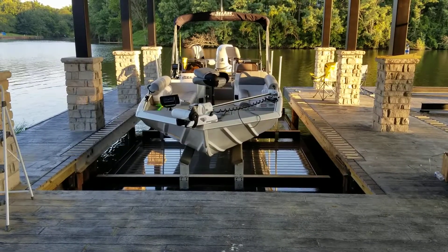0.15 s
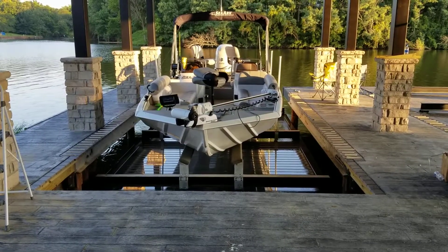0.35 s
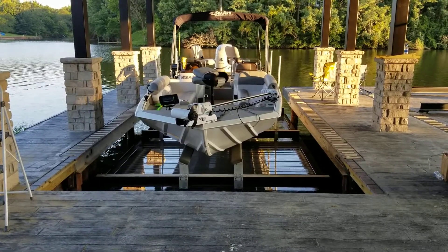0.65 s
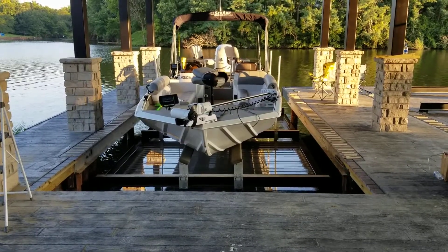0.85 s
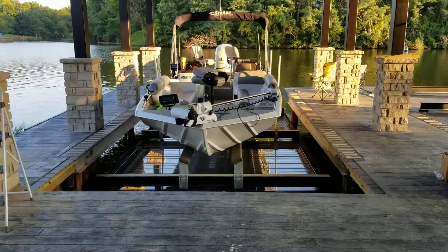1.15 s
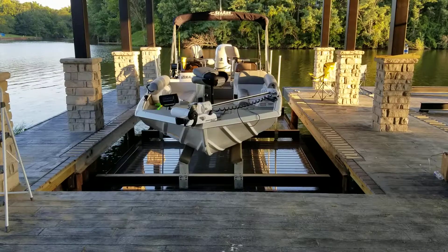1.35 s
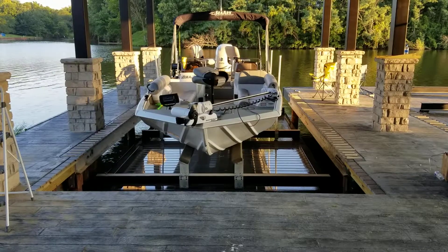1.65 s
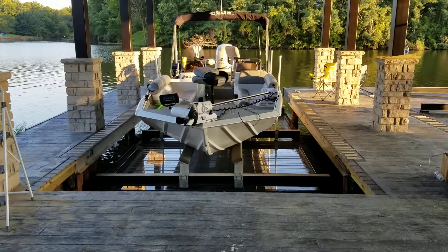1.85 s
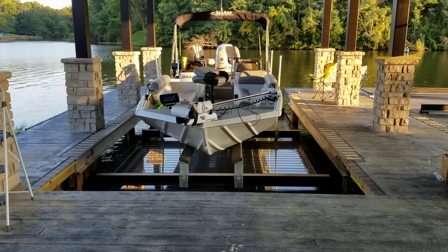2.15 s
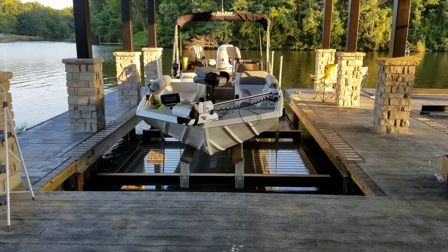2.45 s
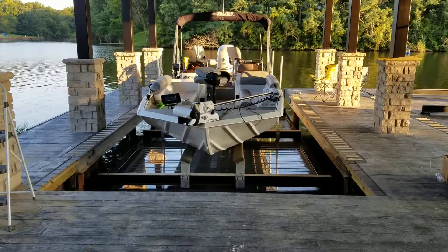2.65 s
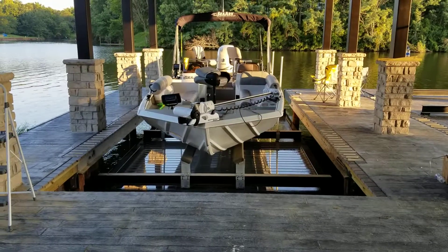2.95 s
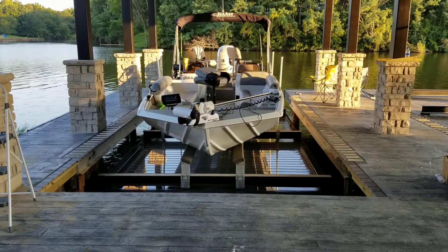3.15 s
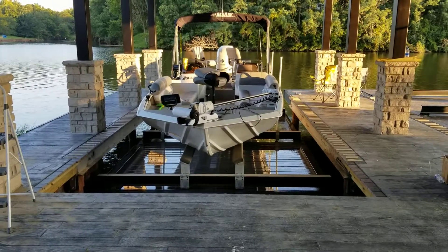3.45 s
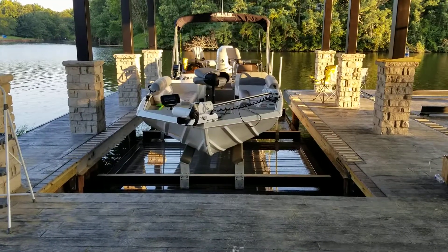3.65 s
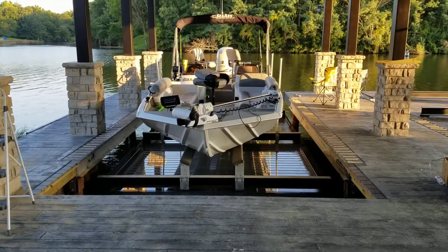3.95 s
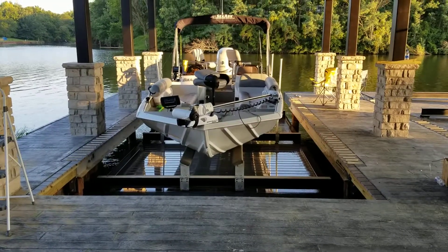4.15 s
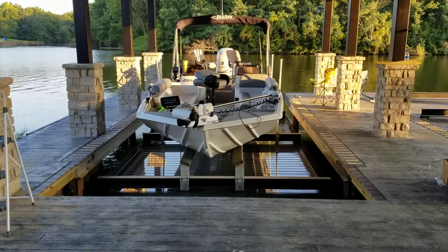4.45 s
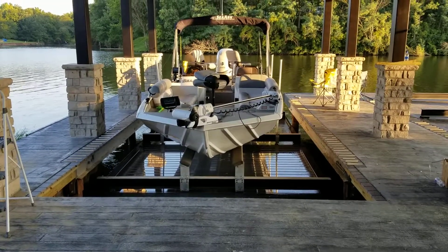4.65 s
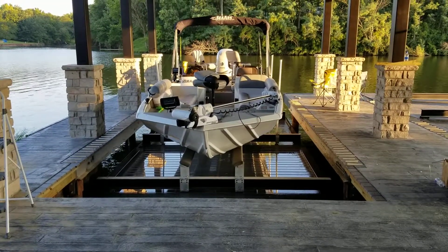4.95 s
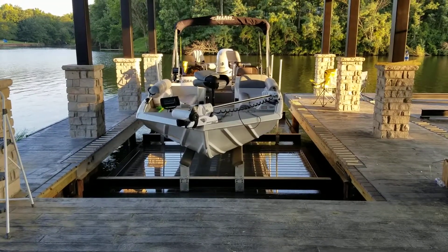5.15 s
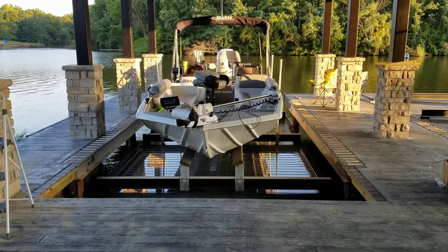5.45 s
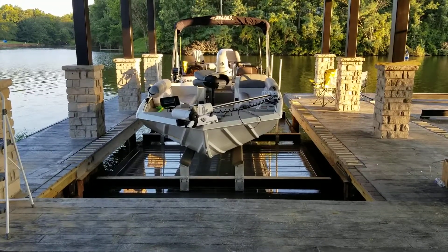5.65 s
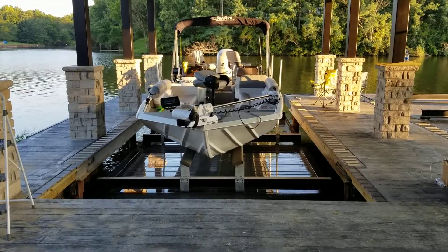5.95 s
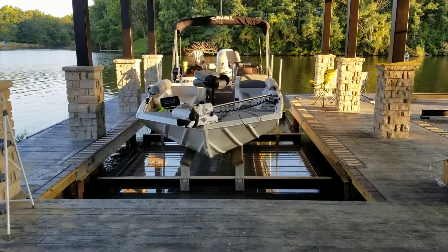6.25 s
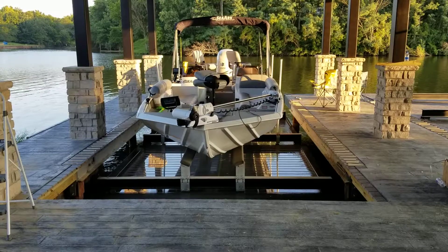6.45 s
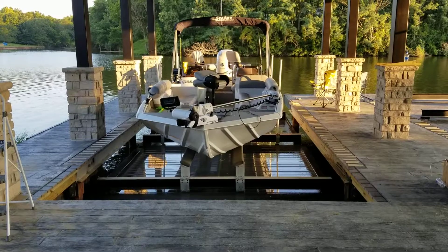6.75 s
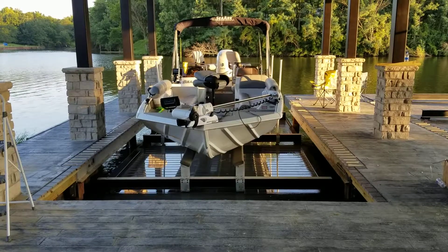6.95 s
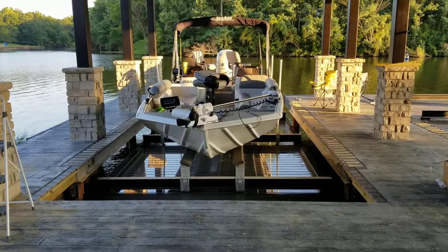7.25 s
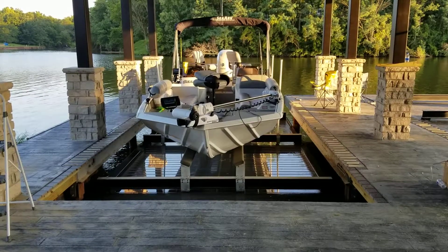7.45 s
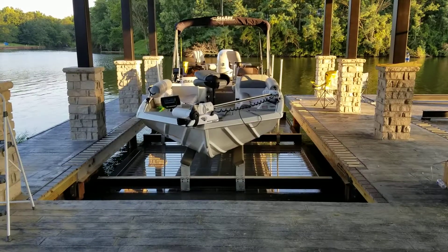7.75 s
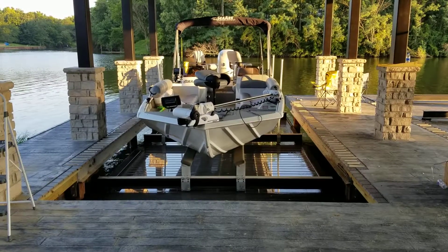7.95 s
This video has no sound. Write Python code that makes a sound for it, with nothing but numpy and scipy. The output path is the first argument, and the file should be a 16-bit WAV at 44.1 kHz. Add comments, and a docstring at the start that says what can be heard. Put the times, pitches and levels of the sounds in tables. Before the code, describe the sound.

A loaded hydraulic pump raising a boat runs without pause in an open boathouse. Its firm, steady gear whine carries a rough electric-motor buzz and rushing oil hiss, brighter toward the left. Far away, two low engines drone and beat together in a quick, even throb. After about four seconds the whine grows duller as the motor labours slightly. Stereo microphones stand close enough for the pump to dominate.

```python
"""Open boathouse, stereo microphones, pump on the left: a loaded hydraulic gear pump raises a boat.
From the start its eleven teeth whine, the uneven shaft buzzes, oil hisses through the valve.
Far off one engine drones; in the first seconds a second boom emerges and beats against it.
After about 4 s the whine dulls as the motor sags, most at 5.9 s; the commutator tone dips, then swells.
Near the end the second engine's overtones weaken, while booms and far rumble have slowly grown."""
import sys
import numpy as np
from scipy import signal
from scipy.fft import rfft, irfft
from scipy.io import wavfile

SR = 44100
rng = np.random.default_rng(int(sys.argv[2]) if len(sys.argv) > 2 else 0)


def store_wav(level_fs):
    """Save 16-bit WAV to argv[1]."""
    pcm = np.round(np.clip(np.atleast_2d(level_fs), -1, 1) * 32767)
    wavfile.write(sys.argv[1], SR, pcm.T.astype(np.int16))


N = 357113
TIME = np.arange(N) / SR  # s
RIGHT_LAG_S = .000285  # extra travel time to the right microphone

# speed of the motor shaft: (t/s, turns per s)
SHAFT_SPEED = [(0, 49.238), (2.9, 49.272), (3.9, 49.246), (4.2, 49.223), (5.9, 49.123), (6.9, 49.221),
               (7.1, 49.21), (8.1, 49.223)]
START_TURNS_PER_S = SHAFT_SPEED[0][1]
SAG_TURNS_PER_S = 0.18  # loss of speed that counts as full load


def shaft_speed():
    """Turns per second of the motor, which slows as it labours."""
    return in_time(SHAFT_SPEED)[0]


def sag():
    """Turns per second that the motor has lost to its load."""
    speed = shaft_speed()
    return speed.max() - speed


def load():
    """Sag as a share of full load."""
    return sag() / SAG_TURNS_PER_S


def pump_line(turns, order, level_db, fade_db):
    """One line of the pump; echoes off deck and roof make the short waves fade and scatter more."""
    echoed = np.sqrt(order * START_TURNS_PER_S / 6000)
    each_side = np.array([drift(2.0), drift(0.89)])
    fading_db = fade_db * echoed * (drift(0.88) + 0.69 * each_side)
    scatter = .22 * min(echoed, 1) ** 6 * rng.standard_normal((2, 1))  # cycles
    cycles = order * turns + rng.random() + scatter
    return tone(cycles, np.reshape(level_db, (2, -1)) + fading_db)


TEETH = 11
# pressure ripple before edge and strain: (multiple of the tooth rate, left level/dB, right level/dB)
TOOTH_LINES = [(1, -26.1, -26.1), (2, -35.8, -44.8), (3, -53.2, -49.2), (4, -44.2, -59.5), (5, -45, -61),
               (6, -46.2, -58.2), (7, -53.2, -57.2), (8, -45.2, -56.2), (9, -42.5, -53.5), (10, -48, -51),
               (11, -47.5, -56.5), (12, -58.5, -61.5), (13, -52.5, -60), (14, -56.5, -58.5),
               (15, -66.5, -66.5), (16, -67.5, -65.5), (17, -48.5, -54.5), (18, -59.5, -60.5),
               (19, -59.5, -63.5), (20, -63.5, -62.5), (21, -49.5, -54.5), (22, -56.5, -59),
               (23, -63.5, -65.5), (24, -56.5, -65.5), (25, -62.5, -66.5), (26, -61.5, -67.5),
               (27, -58.5, -62), (28, -59.5, -60.5), (29, -64, -60.5)]
# how much of the edge reaches each pitch: (f/Hz, dB per dB of edge)
EDGE_SHARE_BY_PITCH = [(2200, 0), (2700, .6), (4300, 0), (4900, .45), (5400, .6), (6000, 1.3), (7000, 1.3),
                       (7600, .3), (9200, .3), (11400, -.2), (13000, .8), (15700, .2)]
# change of the lines as the pump labours: (f/Hz, level/dB at full load)
STRAIN_BY_PITCH = [(1100, -0.5), (2200, 4.5), (4300, 0), (4900, 0.5)]
KNEE_SAG, KNEE_WIDTH = 0.04, 0.0085  # turns per s lost where the whine goes dull
SHARP_DB, DULL_DB = 3.0, -5.5  # edge on either side of the knee


def whine(turns, fade_db=2.0):
    """Each tooth pushes out a slug of oil: a firm fundamental, with upper lines that dull as the motor sags."""
    sharpness = (1 - np.tanh((sag() - KNEE_SAG) / (2 * KNEE_WIDTH))) / 2
    edge_db = DULL_DB + (SHARP_DB - DULL_DB) * sharpness
    strain = load()
    out = 0
    for count, (_, left_db, right_db) in enumerate(TOOTH_LINES, 1):
        hz = count * TEETH * START_TURNS_PER_S
        change_db = at_hz(EDGE_SHARE_BY_PITCH, hz) * edge_db + at_hz(STRAIN_BY_PITCH, hz) * strain
        unsteady = min(count / 5, 1)
        level_db = [[left_db], [right_db]] + change_db
        out = out + pump_line(turns, count * TEETH, level_db, fade_db * unsteady)
    return out


# shaft orders that meet a resonance of tank or frame, rounded to whole orders when played:
# (multiple of the shaft rate, left level/dB, right level/dB)
RESONANT_ORDERS = [(4, -47, -45.5), (6, -53.5, -55), (7, -51, -53), (9, -49.5, -46.5), (10, -50.5, -54.5),
                   (12, -59, -53), (13, -49.5, -46), (17, -55, -53), (18, -56, -56), (23, -50, -57),
                   (28, -56, -57), (32, -49.5, -70), (41, -50.5, -65), (42, -51.5, -56), (62.9, -59.5, -74),
                   (74.15, -53.5, -65), (97.1, -50, -63), (109.1, -52, -59), (132.2, -59, -59),
                   (133, -60, -71)]


def housing(turns):
    """Tank and frame sing along with the shaft orders that fall on their resonances."""
    return sum(pump_line(turns, round(order), sides_db, fade_db=3.5) for order, *sides_db in RESONANT_ORDERS)


# swell and fade of the commutator's octave on the left: (t/s, level/dB)
COMMUTATOR_SWELL = [(0, -42.5), (0.9, -44), (2.2, -39), (3.6, -38), (4.35, -50), (5.0, -38.5), (6.3, -37.5),
                    (6.9, -42.5), (8.1, -44.5)]
BARS = 29
BRUSH_LOW_DB, BRUSH_RIGHT_DB = -5.5, -9  # lower tone against its octave; octave's right against left


def commutator(turns):
    """The brushes cross the bars of the motor: a tone and its stronger octave, which is shaded more on the right."""
    level_db = in_time(COMMUTATOR_SWELL)
    shade_db = np.array([[0], [BRUSH_RIGHT_DB]])
    low = pump_line(turns, BARS, level_db + BRUSH_LOW_DB + shade_db / 2, fade_db=1.7)
    octave = pump_line(turns, 2 * BARS, level_db + shade_db, fade_db=.4)
    return low + octave


# level of every shaft order in the ragged turn: (f/Hz, left level/dB, right level/dB)
TURN_SPECTRUM = [(100, -75, -62), (242, -62, -63.5), (750, -56, -59), (1170, -59.5, -54),
                 (2150, -53.5, -91), (2630, -61.5, -66), (3800, -62, -72.5), (4960, -59, -87),
                 (6150, -69, -69), (8300, -73.5, -88.5), (9900, -98, -68.5), (11100, -68, -84),
                 (15400, -81, -81)]


def one_turn(turns, size=8192, count=320):
    """No two teeth are alike: a ragged pattern that repeats with every turn of the shaft."""
    orders = np.arange(1, count)
    levels = from_db(at_hz(TURN_SPECTRUM, orders * START_TURNS_PER_S))
    scatter = 0.22 * np.minimum(orders / 100, 1) * rng.standard_normal((2, count - 1))
    angles = rng.random(count - 1) + scatter  # cycles
    lines = np.pad(levels * np.exp(2j * np.pi * angles), ((0, 0), (1, 0)))
    shape = irfft(lines, size) * size / np.sqrt(2)
    place = (turns * size).astype(int) % size
    return np.take_along_axis(shape, place, axis=1)


def buzz(turns, unsteady=0.34):
    """A fixed pattern of the turn, mixed with patterns that slowly come and go (share of power)."""
    changing = sum(drift(1.43) * one_turn(turns) for _ in range(4)) / 2
    return np.sqrt(1 - unsteady) * one_turn(turns) + np.sqrt(unsteady) * changing


# oil rushing through the valve, before load: (f/Hz, left level/dB per Hz, right level/dB per Hz)
VALVE_HISS = [(300, -87, -86.5), (600, -79.5, -79.5), (1000, -75, -77), (1500, -73.5, -75),
              (2020, -77.5, -78.5), (2440, -77.5, -82.5), (3590, -73, -79.5), (4930, -74.5, -76.5),
              (5640, -78.5, -84), (7150, -85.5, -88.5), (8700, -99, -99), (10000, -98, -91),
              (11800, -91.5, -92), (15800, -97, -97)]
FLOW_LOAD_DB = 1  # gain of the hiss at full load


def oil(turns, pulsing=0.4):
    """The valve hisses louder under load, and a little harder with every slug of oil."""
    flow = from_db(FLOW_LOAD_DB * load())
    slugs = 1 + pulsing * np.cos(2 * np.pi * TEETH * turns)
    return noise(VALVE_HISS) * flow * slugs


def engine(firings, boom_db, exhaust, bark_db=0, skew=0, waver_db=0):
    """Exhaust pulses from far off: a boom, and overtones that may lean ahead (skew in cycles) and waver on the way."""
    out = tone(firings, boom_db)
    for multiple, level_db in exhaust:
        unsteady_db = level_db + bark_db + waver_db * drift(0.69)
        out = out + tone(round(multiple) * (firings + skew), unsteady_db)
    return out


# firing rates of the two far engines: (t/s, first f/Hz, second f/Hz)
FIRING_RATES = [(0, 70.53, 68.3), (1.5, 70.89, 66.59), (2.8, 70.25, 66.96), (4.2, 70.05, 66.29),
                (5.7, 70.68, 65.99), (6.5, 70.58, 66.69), (8.1, 69.59, 63.87)]
# overtones of the first engine: (multiple of the firing rate, level/dB)
FIRST_OVERTONES = [(2, -52.5), (3, -50), (4, -60), (5, -65.5), (7, -58), (8, -55.5), (9, -59.5), (11, -60),
                   (13, -59)]
# overtones of the second engine, before its bark: (multiple of the firing rate, level/dB)
SECOND_OVERTONES = [(2, -44), (3, -54), (4, -58), (5, -62.5), (6, -65.5)]
# how hard the second engine barks: (t/s, change of overtone level/dB)
SECOND_BARK = [(0, 0.5), (4.4, 0), (5.6, -3.5), (6.3, 1.5), (7, 0.5), (7.4, -7), (8.1, -6)]
FIRST_BOOM_DB, SECOND_BOOM_DB = -46.6, -47.2  # before nearing and hiding
NEARING_DB_PER_S = .24  # growth of both booms as the engines draw nearer
HIDDEN_DB, EMERGE_S = -16.0, 1.7  # second boom at the start, and time constant of its coming into the open


def far_engines():
    """Two engines a few firings a second apart throb together, more deeply as the second boom emerges."""
    first_hz, second_hz = in_time(FIRING_RATES)
    nearer_db = NEARING_DB_PER_S * TIME
    hidden_db = HIDDEN_DB * np.exp(-TIME / EMERGE_S)
    first = engine(np.cumsum(first_hz) / SR, FIRST_BOOM_DB + nearer_db, FIRST_OVERTONES, waver_db=2.0)
    second = engine(np.cumsum(second_hz) / SR, SECOND_BOOM_DB + nearer_db + hidden_db, SECOND_OVERTONES,
                    in_time(SECOND_BARK)[0], skew=0.302, waver_db=1.2)
    return first + second


# far rumble, before its growth: (f/Hz, level/dB per Hz)
FAR_RUMBLE = [(20, -101), (45, -96), (75, -77), (100, -79), (140, -71), (175, -82), (270, -78), (380, -82),
              (700, -87), (1500, -105)]


def rumble(start_db=-1, growth_db_per_s=.5):
    """Low noise from far off that grows steadily."""
    return noise(FAR_RUMBLE) * from_db(start_db + growth_db_per_s * TIME)


# likeness of the two microphones for noise: (f/Hz, correlation -1..1)
CHANNEL_LIKENESS = [(300, 0.86), (800, 0.54), (1500, 0.092), (2500, 0.24), (5000, 0.12), (12000, 0.26)]


def noise(spectrum):
    """Stereo noise of a given density; the channels are most alike at low pitch and the right one lags."""
    hz = np.arange(N // 2 + 1) * SR / N
    alike = np.clip(at_hz(CHANNEL_LIKENESS, hz), -1, 1)
    mid, side = rfft(rng.standard_normal((2, N)))
    pair = np.sqrt(1 + alike) * mid + np.sqrt(1 - alike) * side * [[1], [-1]]
    lag = np.exp(-2j * np.pi * hz * RIGHT_LAG_S * np.array([[0], [1]]))
    return irfft(pair * lag * from_db(at_hz(spectrum, hz)), N) * np.sqrt(SR) / 2


def tone(cycles, db):
    """A sine of the given rms level that follows a count of cycles."""
    phase = (2 * np.pi * (cycles - np.floor(cycles))).astype(np.float32)
    return np.sqrt(2) * from_db(db) * np.cos(phase)


def drift(rate_hz):
    """Slow smooth chance with spread 1: noise through two equal low-passes, made every 200 samples."""
    r = np.exp(-2 * np.pi * rate_hz * 200 / SR)
    raw = rng.standard_normal(N // 200 + 1002)
    slow = signal.lfilter([1], [1, -2 * r, r * r], raw)[1000:]  # settled part
    slow = (slow - slow.mean()) / slow.std()
    return np.interp(np.arange(N) / 200, np.arange(len(slow)), slow)


def from_db(db):
    """Decibels to gain."""
    return 10 ** (np.asarray(db) / 20)


def in_time(rows):
    """Each column of a curve at every sample."""
    s, *columns = np.transpose(rows)
    return np.array([np.interp(TIME, s, c) for c in columns])


def at_hz(rows, hz):
    """Each column of a spectrum at the given frequencies, read along log pitch."""
    points, *columns = np.transpose(rows)
    return np.array([np.interp(np.log(np.maximum(hz, 1)), np.log(points), c) for c in columns])


def scene():
    """The pump trembles slightly under its load; it stands to the left, so the right side hears it later."""
    speed = shaft_speed() * (1 + 0.00018 * drift(22.0))
    turns = np.cumsum(speed) / SR - speed * RIGHT_LAG_S * np.array([[0], [1]])
    tremble = from_db(0.31 * drift(28))
    pump = tremble * whine(turns) + housing(turns) + commutator(turns) + buzz(turns) + oil(turns)
    return pump + far_engines() + rumble()


def record(dry):
    """The microphone signal is cut steeply above 15.8 kHz."""
    return signal.sosfilt(signal.ellip(12, .1, 90, 15800, fs=SR, output="sos"), dry)


dry = scene()
out = record(dry)
store_wav(out)
```